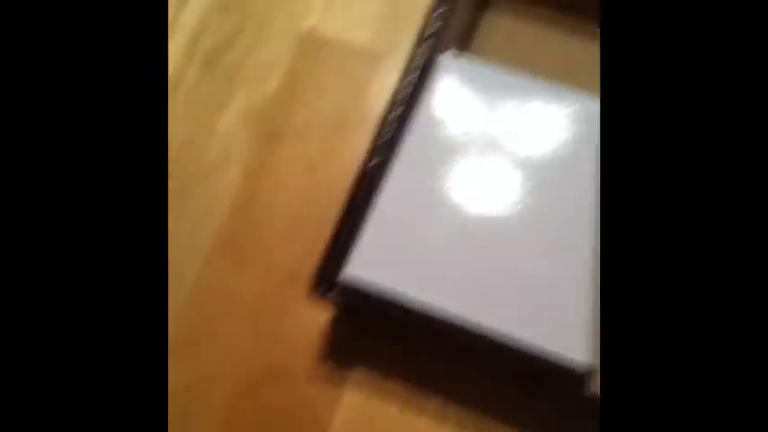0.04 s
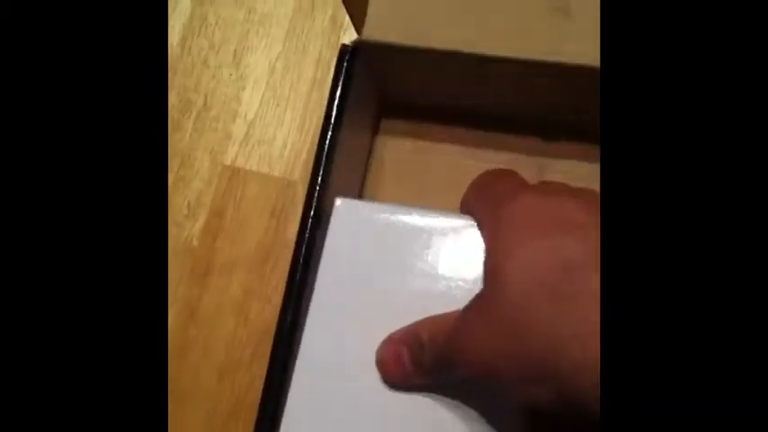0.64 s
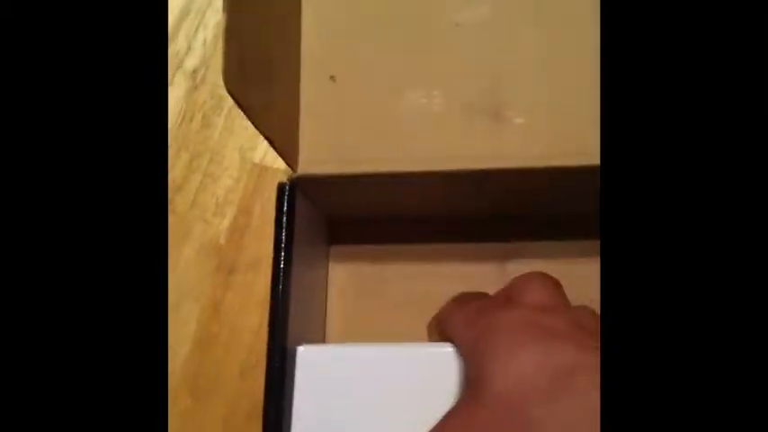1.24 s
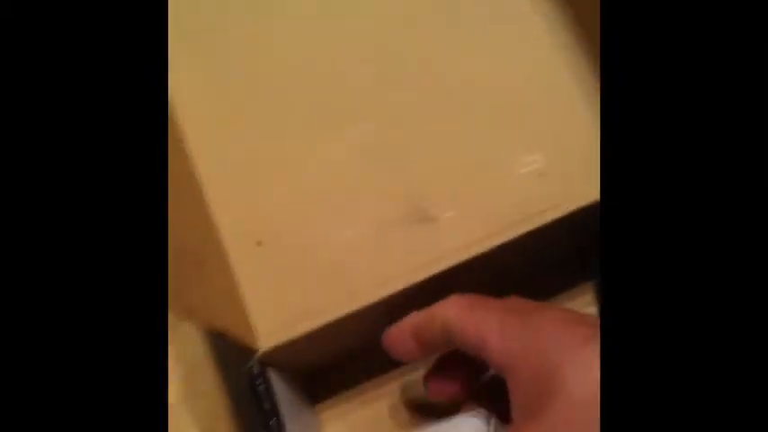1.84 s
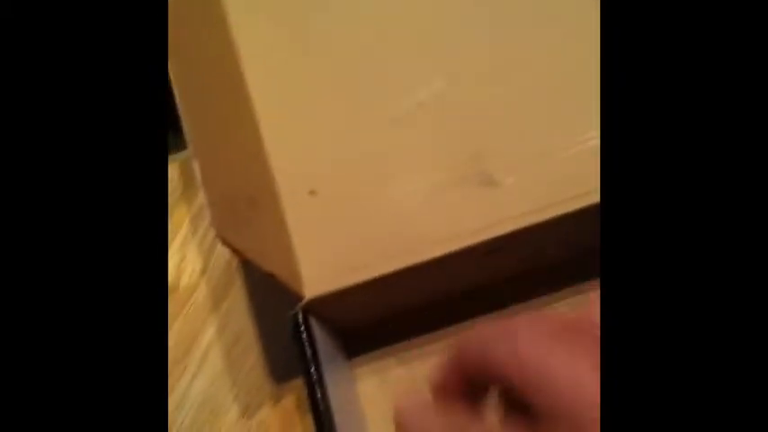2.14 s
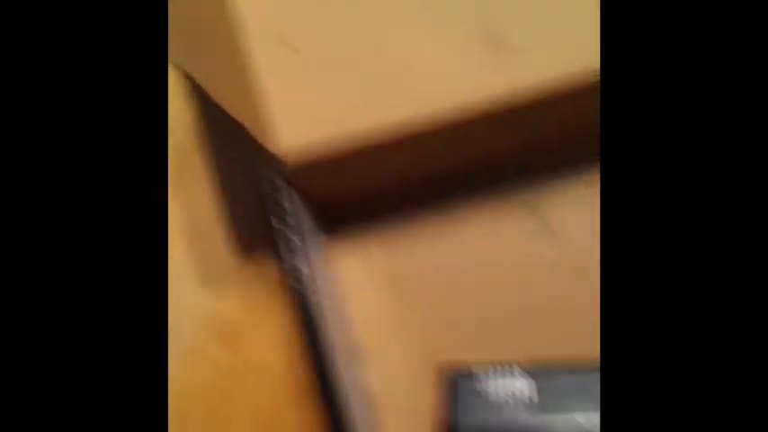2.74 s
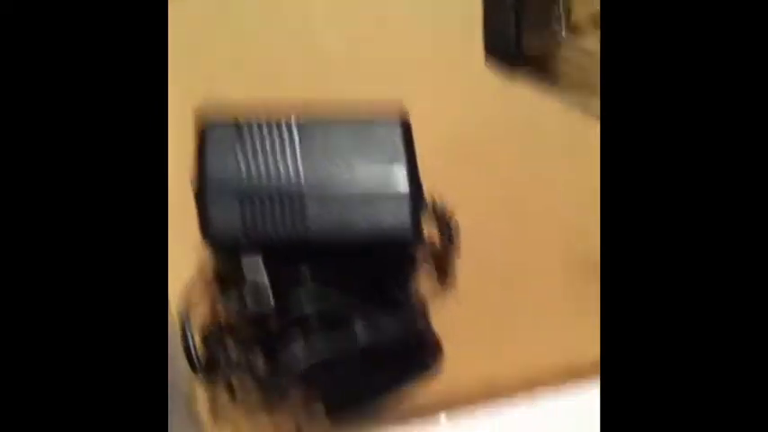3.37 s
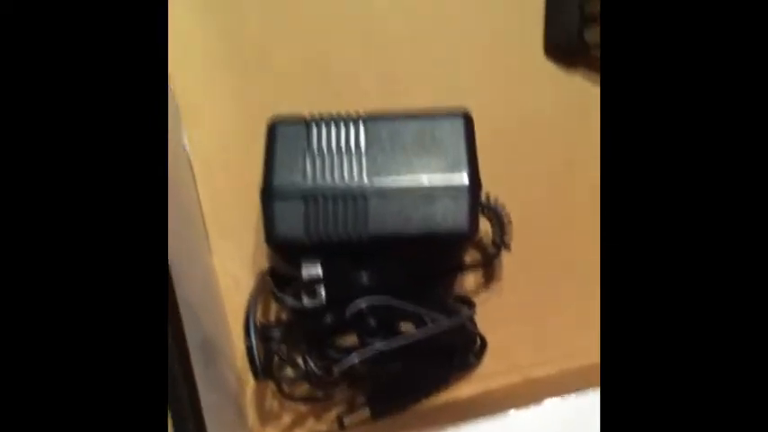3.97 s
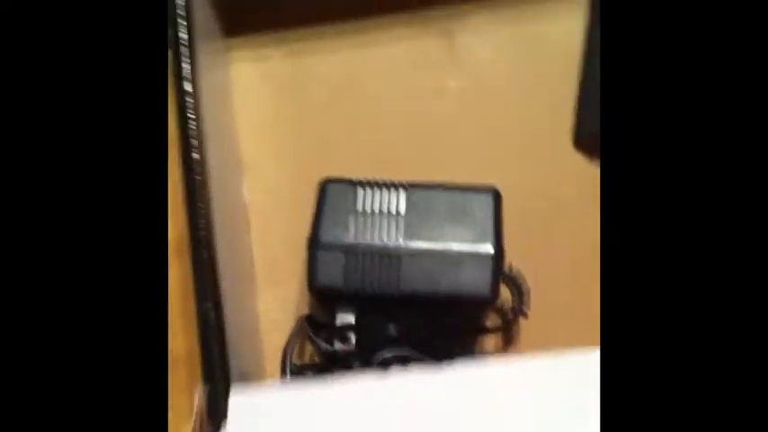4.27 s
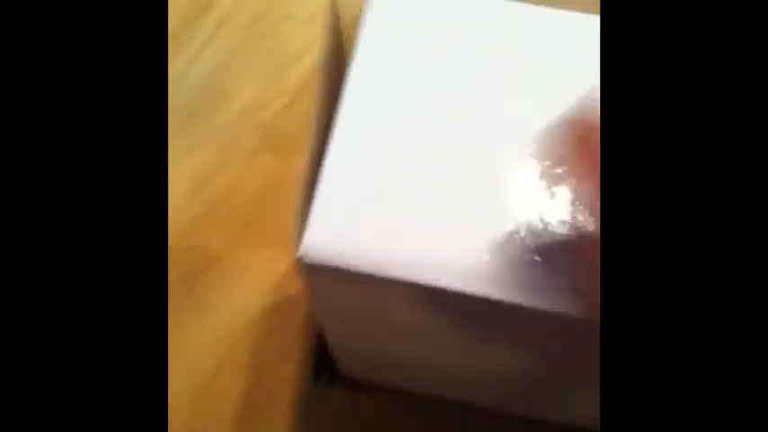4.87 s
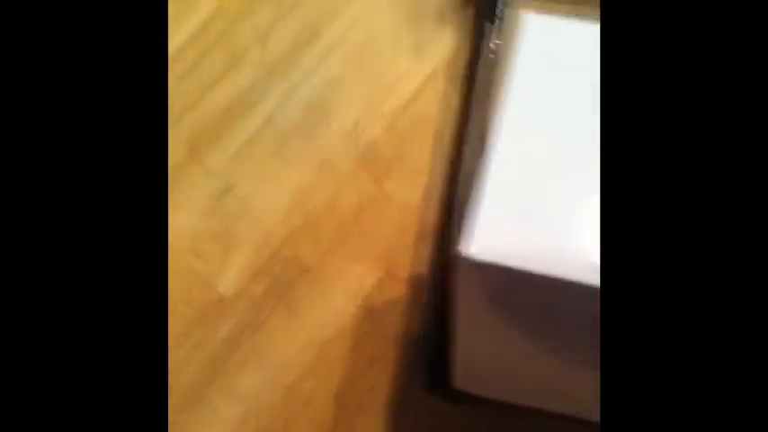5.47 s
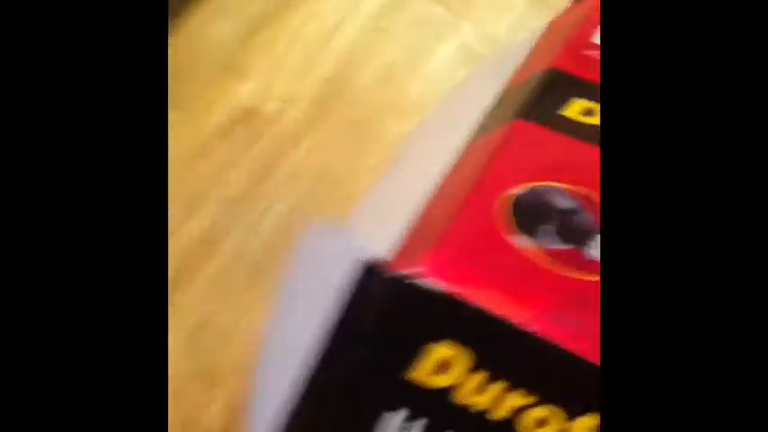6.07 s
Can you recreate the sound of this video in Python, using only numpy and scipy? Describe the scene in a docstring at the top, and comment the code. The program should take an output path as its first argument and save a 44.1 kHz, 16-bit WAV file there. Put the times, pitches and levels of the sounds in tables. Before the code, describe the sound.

Irregular cardboard knocks and faint scrapes in a small room, one hollow thump on a wooden floor, then lighter carton taps.

```python
"""Over a steady hiss and low room noise, card slides on card and a big open cardboard box is knocked.
A small carton is being shifted inside it: panels flex and rebound, fingers bump softly, and a dragged
edge squeaks by stick-slip. The box drops flat on the wooden floor and booms at its resonances; then the
carton, lifted out and turned over, knocks with the modes of its thinner card.
The small room reverberates briefly, and the microphone thins the deep bass."""
import sys
import numpy as np
from scipy import signal
from scipy.fft import rfft, irfft, next_fast_len
from scipy.io import wavfile

SR = 44100
rng = np.random.default_rng(int(sys.argv[2]) if len(sys.argv) > 2 else 0)


def to_wav(s):
    """Save 16-bit WAV."""
    ch = np.atleast_2d(s).T  # columns
    pcm = np.round(np.clip(ch, -1, 1) * 32767)  # PCM
    wavfile.write(sys.argv[1], SR, pcm.astype(np.int16))


N = 274081
TIME = np.arange(N) / SR


def from_db(db):
    """Amplitude ratio of a level in decibels."""
    return 10 ** (np.asarray(db) / 20)


def rms_one(x):
    """Normalisation to rms 1."""
    return x / np.sqrt(np.mean(x ** 2) + 1e-20)


def attack_rms_one(x):
    """Normalisation to rms 1 over the first 10 ms."""
    return x / np.sqrt(np.mean(x[:SR // 100] ** 2))


def fade(t, t60):
    """Exponential decay, 60 dB down after t60."""
    return np.exp(-np.log(1000) * t / t60)


def butter(x, hz, kind, order=2):
    """Causal Butterworth filtering."""
    return signal.sosfilt(signal.butter(order, hz, kind, fs=SR, output="sos"), x + 1e-18)


def coloured(x, spectrum):
    """Spectral shaping of a steady signal, interpolated over log frequency; rms 1."""
    hz, db = np.transpose(spectrum)
    size = next_fast_len(N)
    bins = np.maximum(np.fft.rfftfreq(size, 1 / SR), 1)
    gain = from_db(np.interp(np.log(bins), np.log(hz), db))
    return rms_one(irfft(rfft(x, size) * gain, size)[:N])


def drift(rate_hz):
    """Random modulation: low-passed Gaussian noise of rms 1."""
    return rms_one(butter(rng.standard_normal(N + SR), rate_hz, "low")[SR:])


# spectral density of the microphone hiss: f/Hz, relative level/dB
HISS_SPECTRUM = [(880, -4), (1500, -9.5), (1840, -5.5), (1920, -2), (2180, -1), (2550, -1.5), (3460, -1),
                 (4170, -2), (4920, -3), (5540, -1.5), (6540, -4.5), (7430, -3), (10700, -7.5),
                 (11600, -5.5), (15700, -4)]
# spectral density of room and grip noise: f/Hz, relative level/dB
RUMBLE_SPECTRUM = [(25, -10.5), (45, -21), (80, -10.5), (100, -8), (120, -2), (150, -5.5), (195, -2),
                   (250, -6.5), (310, -15), (400, -20), (600, -19.5), (900, -23.5), (1800, -23),
                   (2400, -36)]

def background(hiss_db=-68.5, rumble_db=-68, waver_db=2.9, whine_hz=15000, whine_db=-93):
    """Noise floor: wavering low room noise, stationary microphone hiss and a faint electronic whine."""
    rumble = from_db(rumble_db + waver_db * drift(6.1)) * coloured(rng.standard_normal(N), RUMBLE_SPECTRUM)
    hiss = from_db(hiss_db) * coloured(rng.standard_normal(N), HISS_SPECTRUM)
    whine = from_db(whine_db) * np.sin(2 * np.pi * whine_hz * TIME)
    return rumble + hiss + whine


# strokes of card on card: start t/s, duration/s, level/dB
SLIDE_STROKES = [(-.03, .05, -70), (0.333, 0.24, -67), (0.898, 0.27, -70), (1.646, 0.24, -61),
                 (1.945, 0.09, -64), (2.127, 0.34, -63), (4.146, 0.14, -73.5), (4.73, 0.055, -67),
                 (4.899, 0.043, -60), (5.152, 0.32, -68), (5.6, 0.14, -67.5), (5.856, 0.17, -63.5)]
# spectral density of the rubbed board: f/Hz, relative level/dB
SLIDE_SPECTRUM = [(60, -52), (150, -26), (280, -0.5), (400, 0), (520, -5.5), (680, -5.5), (790, -7),
                  (920, -8.5), (1150, -7), (1500, -12.5), (2000, -21), (3200, -38)]

def slide(slips_per_s=2500, uneven_db=3.0, grip_db=-76, attack_s=0.035, release_t60=0.42):
    """Sliding friction: fibres catch and slip, exciting the board with random impulses."""
    power = from_db(grip_db) ** 2   # the hand never holds the card quite still
    for start, length, db in SLIDE_STROKES:
        attack = np.clip((TIME - start) / attack_s, 0, 1)
        release = fade(np.clip(TIME - start - length, 0, 1), release_t60)
        power = power + (from_db(db) * attack * release) ** 2   # incoherent sources add in power
    slips = (rng.random(N) < slips_per_s / SR) * rng.choice([-1, 1], N)
    return np.sqrt(power) * from_db(uneven_db * drift(19)) * coloured(slips, SLIDE_SPECTRUM)


# octave bands of the room's tail: centre f/Hz, relative level/dB, T60/s
ROOM_BANDS = [(87, -15.5, .4), (176, -6.5, 0.35), (343, -9, 0.43), (722, -10, 0.24), (1600, -14.5, 0.14),
              (3000, -9, 0.13)]

def room(x, build_s=0.0077):
    """Reverberation: a diffuse field builds up quickly and decays at its own rate in each octave."""
    t, response = np.arange(SR // 2) / SR, 0
    build_up = 1 - np.exp(-(t / build_s) ** 2)
    for hz, db, t60 in ROOM_BANDS:
        edges = hz * np.sqrt([1 / 2, 2])
        tail = butter(rng.standard_normal(len(t)), edges, "band", order=3) * fade(t, t60) * build_up
        unit_band_gain = np.sqrt(2 * np.diff(edges) / SR / np.sum(tail ** 2))
        response = response + from_db(db) * tail * unit_band_gain
    return signal.fftconvolve(x, response)[:N]


def clack(t, modes, hardness_hz, detune=0.027, spot_db=5.5, crunch_db=-16.0, give_s=0.00028):
    """Modal excitation: an edge contact rings the board, differently at each spot, and crushes fibres."""
    hz, db, t60 = np.transpose(modes)[:, :, None]
    pitch, strength, side = rng.standard_normal((3, len(modes), 1))
    amplitude = np.sign(side) * from_db(db + spot_db * strength)
    rings = amplitude * np.sin(2 * np.pi * hz * (1 + detune * pitch) * t) * fade(t, t60)
    rings = butter(rings.sum(axis=0), hardness_hz, "low", order=4)   # soft contacts miss the high modes
    fibres = butter(rng.standard_normal(len(t)) * fade(t, t60=0.054), [500, 2400], "band", order=4)
    fibres = butter(fibres, 1.48 * hardness_hz, "low", order=3)
    sound = attack_rms_one(rings) + from_db(crunch_db) * attack_rms_one(fibres)
    onset = 1 - np.exp(-t / give_s)   # the edge gives before it pushes back
    return butter(attack_rms_one(sound * onset), 110, "high")


def knocks(table, modes, panel_t60, flex_s, leak_share, sway_db,
           rebound_s, rebound_hz, rebound_panel_db, rebound_clack_db):
    """Impact and rebound: a panel swings, its edge clacks, the box rocks; then the far edge lands."""
    out, t = np.zeros(N), np.arange(SR // 6) / SR

    def swing(hz, t60):
        """Damped oscillation with an acoustic short circuit: slow motion only moves air round the panel."""
        motion = np.sin(2 * np.pi * hz * t) * fade(t, t60) * (1 - np.exp(-t / flex_s))
        radiated = butter(motion, leak_share * hz, "high")
        return -radiated / np.abs(radiated).max()

    sway = from_db(sway_db) * swing(hz=162, t60=0.11)   # the whole box on its flexible bottom
    far_panel = swing(rebound_hz, panel_t60)
    for s, panel_db, panel_hz, clack_db, hardness_hz in table:
        near_edge, far_edge = (from_db(clack_db) * clack(t, modes, hardness_hz) for _ in range(2))
        body = from_db(panel_db) * (swing(panel_hz, panel_t60) + sway)
        rebound = from_db(rebound_clack_db) * far_edge + from_db(panel_db + rebound_panel_db) * far_panel
        add(out, s, near_edge + body)
        add(out, s + rebound_s, rebound)
    return out


# impacts on the big box: t/s, panel level/dB, panel f/Hz, clack level/dB, contact cutoff f/Hz
BOX_IMPACTS = [(.118, -48.5, 365, -61, 1810), (.390, -43.5, 336, -55, 1110), (.4085, -29, 188, -37.5, 1390),
               (.549, -57, 370, -53, 2180), (.655, -55, 253, -56, 1400), (.986, -56, 272, -64, 1200),
               (1.290, -55, 287, -56, 1300), (1.729, -54, 296, -55.5, 1100),
               (1.7835, -33.5, 351, -40, 1200), (1.7855, -35, 680, -45.5, 2500),
               (1.795, -37.5, 168, -45.5, 1180), (1.831, -45, 163, -47, 1050),
               (1.881, -49.5, 158, -50.5, 1600), (2.022, -46, 404, -56, 1390),
               (2.128, -44.5, 400, -53.5, 1500), (2.306, -46.5, 246, -58.5, 1700),
               (2.349, -21, 230, -40.5, 1400), (2.400, -42, 392, -53, 1300), (2.449, -45, 253, -57, 1700),
               (2.9115, -40.5, 632, -50, 2030), (4.181, -59, 226, -61, 1750),
               (4.227, -44.5, 466, -60, 1020)]
# modes of its corrugated wall: f/Hz, relative level/dB, T60/s
CORRUGATED_MODES = [(267, -3.5, 0.3), (334, -7, 0.056), (377, -8, 0.19), (481, 12, 0.041),
                    (567, -3.5, 0.034), (633, 9, 0.018), (820, 2, 0.097), (915, -1, 0.059), (978, 8, 0.021),
                    (1020, -45, 0.066), (1097, -3.5, 0.15), (1205, 5, 0.029), (1300, 6.5, 0.043),
                    (1530, 6, 0.025), (1690, -3, 0.011), (2050, -5, 0.052), (2090, -33, 0.018)]

def box_knocks():
    """Flexural vibration of the big box's corrugated walls after each impact."""
    return knocks(BOX_IMPACTS, CORRUGATED_MODES,
                  panel_t60=0.039, flex_s=0.00087, leak_share=0.7, sway_db=-19.5,
                  rebound_s=0.022, rebound_hz=304, rebound_panel_db=-13, rebound_clack_db=-19.5)


# soft contacts of the hand: t/s, level/dB, f/Hz
FINGER_BUMPS = [(1.45, -52, 124), (2.644, -51, 139), (2.997, -51.5, 226), (3.069, -46, 125),
                (3.101, -49.5, 286), (3.124, -35, 178), (3.151, -41.5, 172), (3.276, -45.5, 146),
                (3.46, -50, 152), (4.043, -48.5, 158), (4.295, -48.5, 185), (4.622, -51.5, 157),
                (6.164, -39.5, 161)]

def bumps(rise_s=0.0038):
    """Heavily damped impact: flesh pushes slowly and absorbs the motion, leaving a dull thud."""
    out, t = np.zeros(N), np.arange(SR // 20) / SR
    push = (t / rise_s * np.exp(1 - t / rise_s)) ** 2
    for s, db, hz in FINGER_BUMPS:
        add(out, s, from_db(db) * push * np.sin(2 * np.pi * hz * (t - rise_s)))
    return out


# squeaks and groans of a dragged edge: start t/s, duration/s, f/Hz, level/dB
EDGE_SQUEAKS = [(1.67, 0.06, 998, -63), (1.734, 0.08, 1123, -53.5), (2.042, 0.112, 400, -64),
                (2.166, 0.091, 808, -63.5)]

def squeak(jitter=0.0274, rough_db=4.5, ramp_s=0.017):
    """Stick-slip oscillation: for a moment the slips lock into an unsteady tone."""
    out = np.zeros(N)
    wobbling_time = np.cumsum(1 + jitter * drift(186)) / SR
    flutter = from_db(rough_db * drift(80))
    for start, length, hz, db in EDGE_SQUEAKS:
        dragging = np.clip(np.minimum(TIME - start, start + length - TIME) / ramp_s, 0, 1)
        out += from_db(db) * dragging * flutter * np.sin(2 * np.pi * hz * wobbling_time)
    return out


# resonances of the open box, its lid and its air: f/Hz, relative level/dB, T60/s
BOX_RESONANCES = [(114, -24.5, 0.55), (155.4, -12.5, 0.41), (216.5, -2.5, 0.17), (235.5, -15.5, 0.4),
                  (342, -14, 0.44), (384.4, -14.5, 0.3), (436, -10, .27), (520, -38, 0.17),
                  (850, -35, 0.26), (1045, -46, 0.22)]
# the big box landing flat on the floor: t/s, level/dB
BOX_DROPS = [(2.349, -23.5)]

def boom(build_s=0.0049):
    """Free vibration: dropped flat, the whole box and its air ring on at their natural frequencies."""
    out, t = np.zeros(N), np.arange(SR // 2) / SR
    ring = sum(from_db(db) * np.sin(2 * np.pi * hz * t) * fade(t, t60) for hz, db, t60 in BOX_RESONANCES)
    for s, db in BOX_DROPS:
        add(out, s, -from_db(db) * ring * (1 - np.exp(-t / build_s)))
    return out


# impacts on the carton: t/s, panel level/dB, panel f/Hz, clack level/dB, contact cutoff f/Hz
CARTON_IMPACTS = [(4.7205, -33, 454, -45.5, 1400), (4.754, -49, 326, -71, 700),
                  (4.789, -45.5, 268, -68, 700), (4.916, -42, 507, -61, 1500),
                  (4.952, -37.5, 436, -53.5, 950), (4.964, -39, 232, -60, 705), (4.996, -42, 242, -66, 700),
                  (5.0295, -35.5, 488, -50.5, 730), (5.097, -49, 438, -78, 700),
                  (5.127, -40, 166, -48.5, 910), (5.238, -46, 146, -49, 1340), (5.301, -64, 394, -59, 1300),
                  (5.349, -52, 433, -56.5, 1200), (5.383, -50, 730, -56.5, 900),
                  (5.447, -46, 736, -51, 1400), (5.483, -48.5, 400, -59.5, 1200),
                  (5.5705, -31, 302, -37, 2280), (5.601, -39, 162, -49, 1500), (5.623, -43, 876, -47, 2180),
                  (5.742, -47, 302, -60.5, 680), (5.882, -45, 265, -71, 1500),
                  (5.924, -44.5, 339, -67, 1200), (6.030, -33, 382, -57.5, 1600)]
# modes of its thin card: f/Hz, relative level/dB, T60/s
THIN_CARD_MODES = [(285, -1, 0.036), (380, 6.5, 0.039), (440, 5.5, 0.012), (510, -17, 0.079),
                   (625, -3.5, 0.1), (718, 5, 0.071), (780, -9, 0.021), (869, 1, 0.031), (990, 6.5, 0.012),
                   (1104, -1.5, 0.043), (1350, -13, 0.037), (1330, -11, 0.013), (1660, -30, .03),
                   (1760, -7, 0.033), (2190, -4, 0.034), (2250, -13, 0.012)]

def carton_knocks():
    """Flexural vibration of the small carton's thin card, with a quicker, stronger rebound."""
    return knocks(CARTON_IMPACTS, THIN_CARD_MODES,
                  panel_t60=0.044, flex_s=0.00057, leak_share=0.41, sway_db=-16,
                  rebound_s=0.0105, rebound_hz=375, rebound_panel_db=-9, rebound_clack_db=-3)


def add(out, s, sound):
    """Superposition of a sound onto the output, starting at time s."""
    at = int(s * SR)
    out[at:at + len(sound)] += sound[:N - at]


def scene(room_db=2.0, bump_send_db=-9.0):
    """Direct and reverberant sound add; the bumps are close, so their direct sound dominates."""
    cardboard = box_knocks() + slide() + squeak() + carton_knocks()
    thuds = bumps()
    reverberation = from_db(room_db) * room(cardboard + from_db(bump_send_db) * thuds)
    return (background() + cardboard + thuds + boom() + reverberation)[None]


def record(dry, bass_cut_hz=70, bass_leak=0.41, top_hz=15750):
    """Band limiting: the small microphone thins the deep bass, and a steep low-pass cuts the top."""
    thin = bass_leak * dry + (1 - bass_leak) * butter(dry, bass_cut_hz, "high")
    return signal.sosfilt(signal.ellip(12, .1, 70, top_hz, fs=SR, output="sos"), thin)


dry = scene()
out = record(dry)
to_wav(out)
```